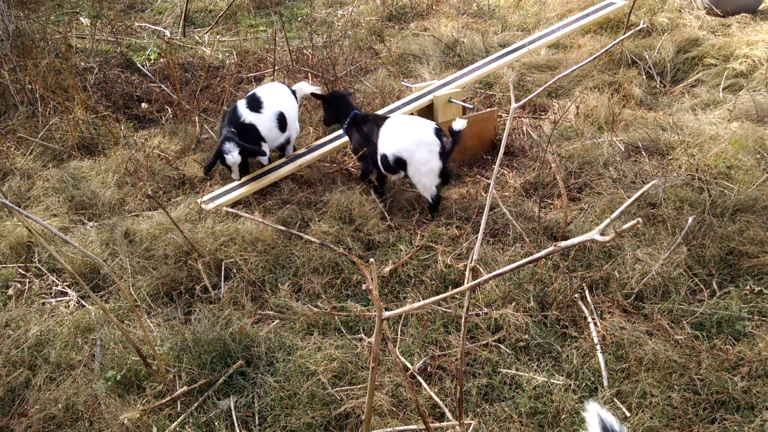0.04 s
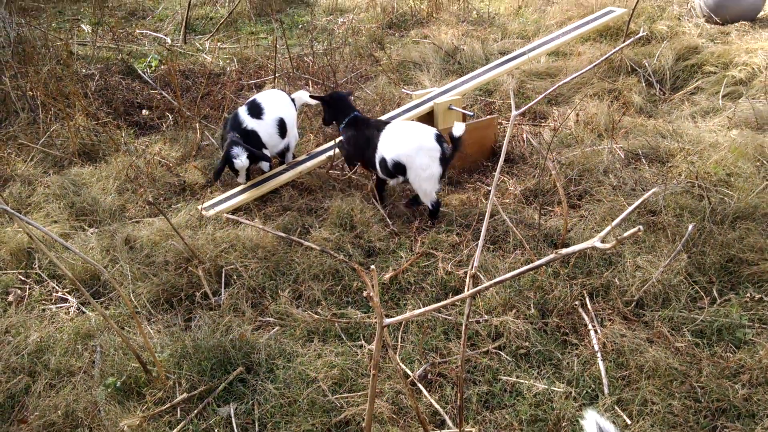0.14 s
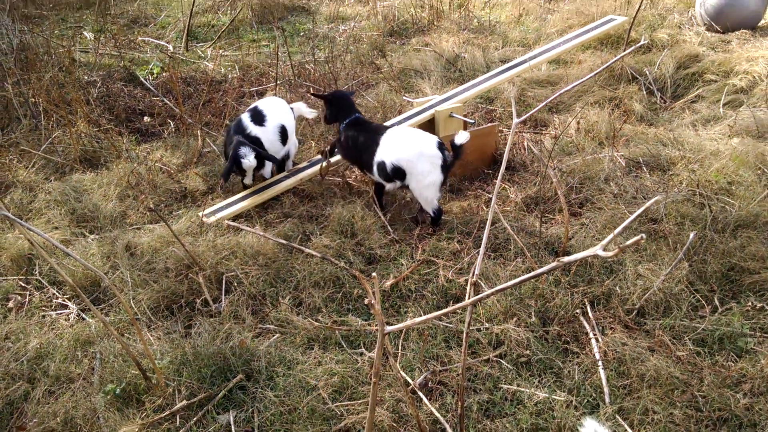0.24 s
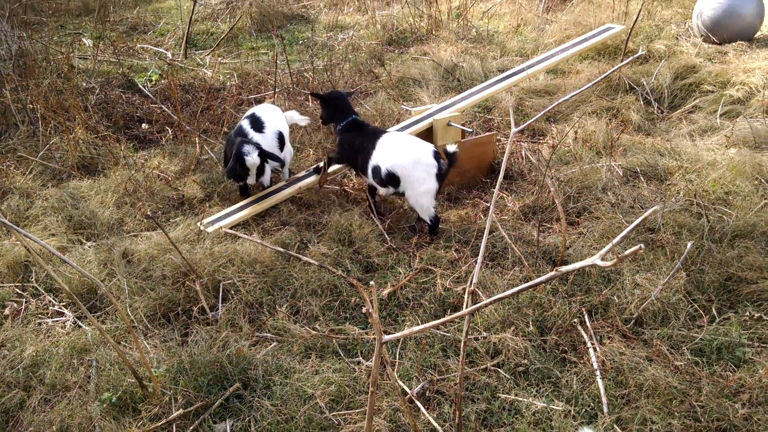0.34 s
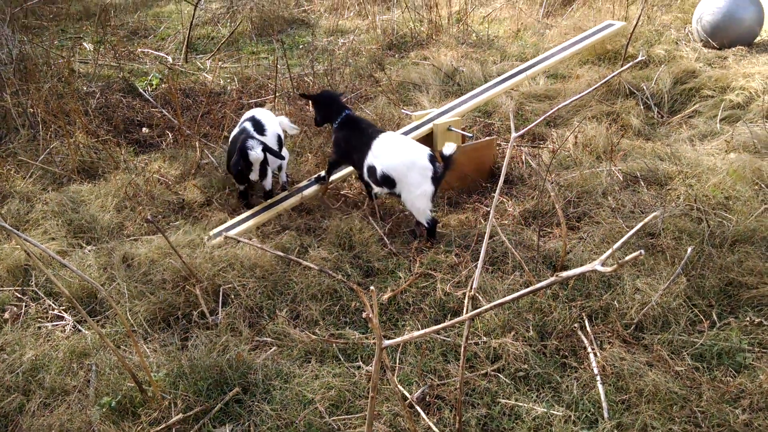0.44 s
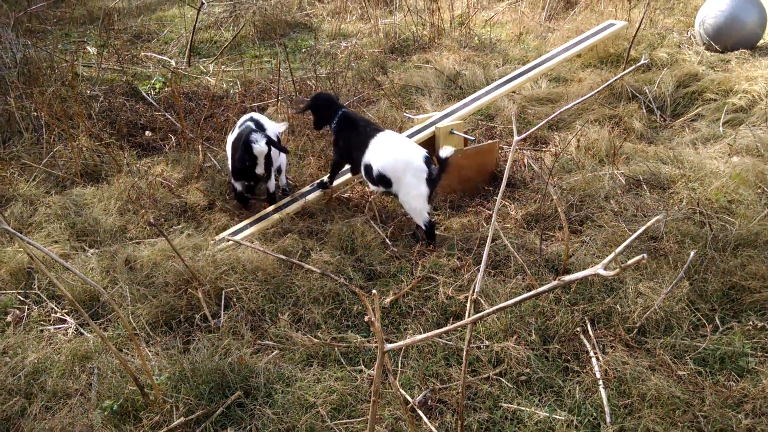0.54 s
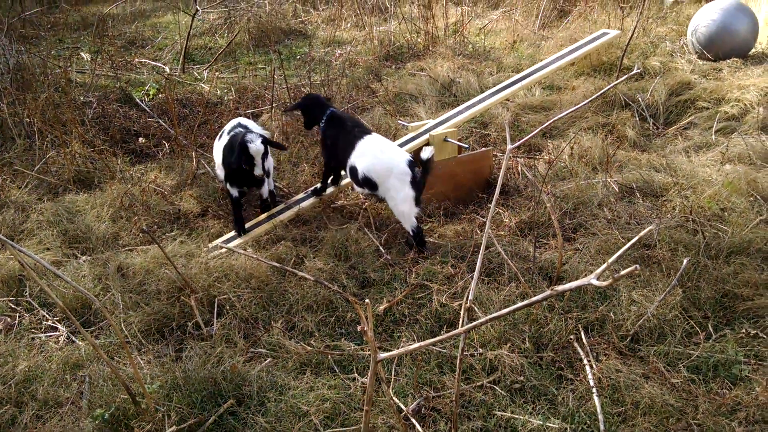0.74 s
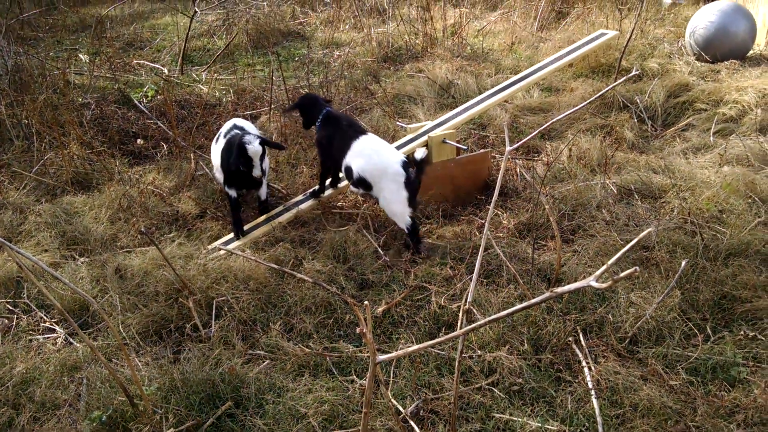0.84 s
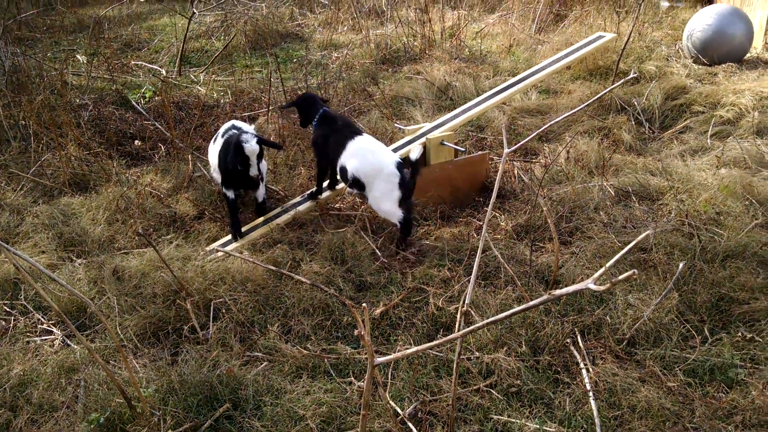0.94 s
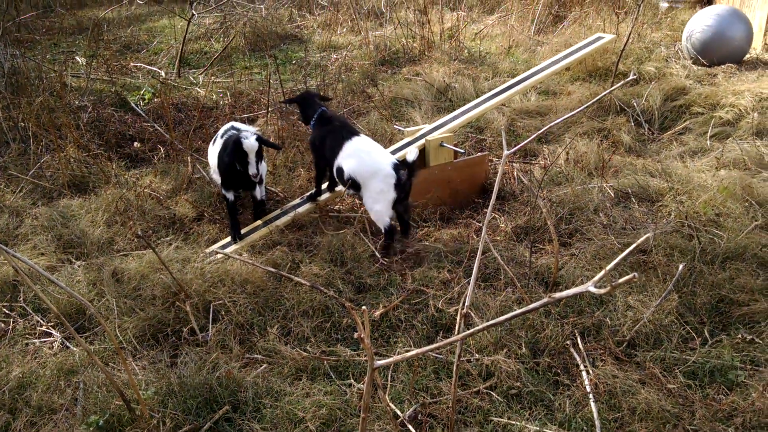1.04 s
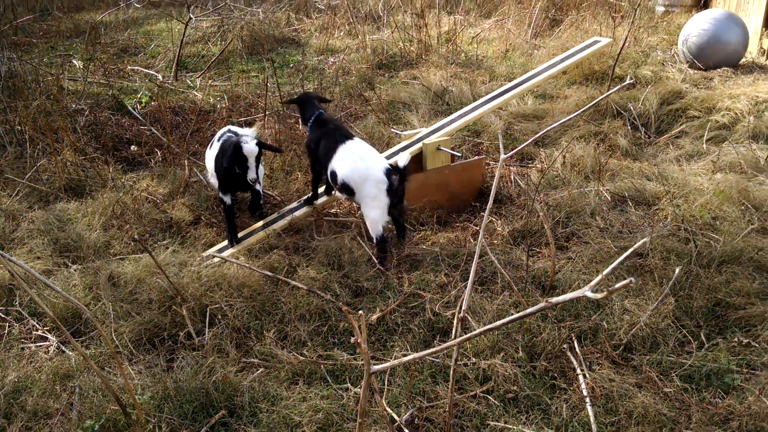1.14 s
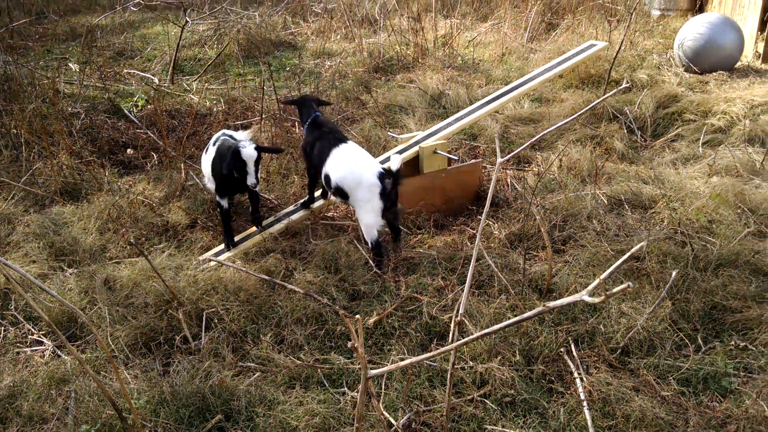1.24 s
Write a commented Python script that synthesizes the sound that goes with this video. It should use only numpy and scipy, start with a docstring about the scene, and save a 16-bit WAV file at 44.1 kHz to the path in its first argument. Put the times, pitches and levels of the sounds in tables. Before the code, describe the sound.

Goat hooves knock on a wooden plank, one sharp clack and several softer taps, among dull close thumps like bumps on the microphone; dry grass ticks and faint wind hisses in an open field.

```python
"""A dry field with a wooden plank lying in it: two young goats step on the board.
Each hoof lands in a few quick contacts that ring the plank's modes and rattle it, with edge clicks and soft rubbing.
Dull, close thumps shake the two microphone ports in opposite directions, like bumps on the camera's body.
Dry stalks tick as short noise bursts; a faint wind is shaped noise, hissing in swells over a low rumble."""
import sys
import numpy as np
from scipy import signal
from scipy.fft import rfft, irfft, next_fast_len
from scipy.io import wavfile
from scipy.ndimage import map_coordinates

SR = 44100
rng = np.random.default_rng(int(sys.argv[2]) if len(sys.argv) > 2 else 0)


def digitize_waveform(pressure):
    """Quantize a signal to 16-bit integers and store it at the path in sys.argv[1].

    Rows of a 2-D input are taken as channels; values are limited to [-1, 1].
    """
    field = np.atleast_2d(pressure).T
    bounded = np.clip(field, -1, 1)
    quanta = np.round(bounded * 32767).astype(np.int16)
    wavfile.write(sys.argv[1], SR, quanta)


N = 57330


def amp(db):
    """Decibels to gain."""
    return 10 ** (np.asarray(db) / 20)


def unit(x):
    """Scale to rms 1."""
    return x / np.sqrt(np.mean(x ** 2) + 1e-20)


def along(points, hz):
    """Read a curve of (f/Hz, value) points on a log frequency axis."""
    f, value = np.transpose(points)
    return np.interp(np.log(hz + 1), np.log(f + 1), value)


def filtered(x, response):
    """Shape the spectrum of x by a response, given as a function of frequency."""
    n = x.shape[-1]
    padded = next_fast_len(n + 8192)
    spectrum = rfft(x, padded) * response(np.fft.rfftfreq(padded, 1 / SR))
    return irfft(spectrum, padded)[..., :n]


def panned(x, pan):
    """Tilt x between left and right, band by band."""
    def gains(hz):
        left_db = along(pan, hz) / 2
        return amp(np.array([left_db, -left_db]))
    return filtered(x, gains)


# likeness of the two ports: [f/Hz, correlation, held within +-0.98]
PORT_LIKENESS = [(30, 0.81), (110, 0.43), (280, 0.27), (600, 0.62), (1300, 1), (1900, 0.089), (2400, -1.01),
                 (2800, -1.01), (3300, -0.31), (4000, 1), (5300, -0.88), (7000, 0.44), (8200, -0.73),
                 (10000, 0.098), (14000, -0.44)]


def noise(colour, size):
    """Coloured stereo noise of rms 1, as the two spaced ports hear a wide source."""
    def mid_side(hz):
        turn = np.arccos(np.clip(along(PORT_LIKENESS, hz), -.98, .98)) / 2
        return amp(along(colour, hz)) * [np.cos(turn), np.sin(turn)]
    mid, side = filtered(rng.standard_normal((2, size)), mid_side)
    return unit(np.array([mid + side, mid - side]))


def wobble(rate):
    """A smooth random curve, rate knots a second."""
    knots = rng.standard_normal(int(N * rate / SR) + 4)
    return map_coordinates(knots, [np.arange(N) * rate / SR])


def add(track, s, sound):
    """Mix a sound into the track at s seconds."""
    part = track[:, max(round(s * SR), 0):][:, :sound.shape[-1]]
    part += sound[..., :part.shape[1]]


# hoof contacts: [t/s, level/dB, brightness f/Hz, place along the board 0-1, free ring 0-1, rattle level/dB]
HOOF_CONTACTS = [(0.2074, -38.5, 616, 0.01, 0.47, -20), (0.2099, -43, 470, 0.33, 0.8, -4),
                 (0.2139, -44, 400, 0.58, .5, -16), (0.3971, -27.5, 2400, 0.03, 0.93, -18),
                 (0.3992, -23, 1650, 0.35, 0.94, -8.5), (0.4074, -33.2, 1950, 0.02, 0.8, -3),
                 (0.407, -29, 2400, 0.21, 0.7, -10), (.4285, -40, 1800, 0.37, 1, -9),
                 (0.5188, -48, 2180, 0.55, 0.4, 2), (.5670, -47, 1100, 0.44, 0.2, -3),
                 (0.6738, -44.5, 2500, 0.28, 0.6, -14), (.6835, -42, 450, 0.16, .5, -1),
                 (.7005, -52, 397, 0.16, 0.2, -1), (0.8115, -40.5, 1300, 0.2, 0.2, -16),
                 (0.8149, -33, 1600, 0.71, 0.8, -16), (0.864, -37, 860, 0.89, 0.78, -12),
                 (0.8675, -35, 810, 0.83, 0.73, -25), (0.8778, -37.5, 3000, 0.53, 0.5, -2),
                 (0.8850, -42, 1600, 0.84, .4, -6), (1.0691, -44.5, 3500, 0.24, 0.5, 1),
                 (1.1737, -41.5, 596, 0.95, 0.4, -2), (1.1985, -46, 805, 0.96, .5, 7),
                 (1.2038, -36.5, 524, 0.13, 0, -7)]
# modes of the plank: [f/Hz, level/dB, t60/s]
PLANK_MODES = [(227.7, -11, 0.2), (342.6, -0.5, 0.039), (376.8, -8, 0.28), (507, -13.5, 0.06),
               (541, -2, 0.026), (624.6, -18, 0.28), (904, -15.5, 0.2), (1085.5, -11, 0.083),
               (1204, -6.5, 0.075), (1270, -8, 0.061), (1384, -8, 0.065), (1600, -27, 0.071),
               (1760, -46, 0.054), (272.2, -6.5, 0.07)]
# colour of the board's dense, short-lived rattle: [f/Hz, level/dB per Hz]
RATTLE_COLOUR = [(100, -30), (250, 5), (550, -1.5), (800, 8.5), (1600, -6), (2000, -15.5), (2700, -6.5),
                 (4000, -7), (6000, -28), (12000, -54)]
# where the plank sits in the stereo picture: [f/Hz, left minus right level/dB]
PLANK_BALANCE = [(150, -5), (380, -6), (700, -4.5), (1300, 0), (3000, 10)]
PLACE_DEPTH = 0.92  # how much the place of a contact favours some modes over others
MODE_SCATTER_DB = 1.5
HOOF_DAMPING_DB_PER_S = 691  # extra decay under a hoof that stays firmly down
PLANK_ATTACK_S = .0006
RATTLE_T60_S, RATTLE_LOW_T60_S, RATTLE_SPLIT_HZ = .075, .125, 550
BASS_CUT_HZ = 195  # a narrow board radiates little below this


def hooves():
    """Contacts rattle the board and ring modes by place; soft ones lack highs, a staying hoof damps the ring."""
    out, t = np.zeros((2, N)), np.arange(SR // 3) / SR
    hz, mode_db, t60 = np.transpose(PLANK_MODES)[:, :, None]
    order = np.arange(len(PLANK_MODES))[:, None] + 1
    rise = 1 - np.exp(-t / PLANK_ATTACK_S)
    for s, db, bright_hz, place, free, rattle_db in HOOF_CONTACTS:
        softness = lambda f: 1 / np.sqrt(1 + (f / bright_hz) ** 4)
        damping_db = HOOF_DAMPING_DB_PER_S * (1 - min(free, 1)) * t

        modes = amp(mode_db - 60 * t / t60 - damping_db) * np.sin(2 * np.pi * hz * t)
        favour = 1 + PLACE_DEPTH * np.cos(np.pi * order * place)
        scatter = amp(MODE_SCATTER_DB * rng.standard_normal(hz.shape))
        ring = np.sum(modes * softness(hz) * favour * scatter, axis=0)

        rattle = filtered(rng.standard_normal(len(t)), lambda f: amp(along(RATTLE_COLOUR, f)))
        rattle = filtered(unit(rattle), softness)
        low = filtered(rattle, lambda f: 1 / (1 + (f / RATTLE_SPLIT_HZ) ** 4))
        high = rattle - low
        rattle = low * amp(-60 * t / RATTLE_LOW_T60_S) + high * amp(-60 * t / RATTLE_T60_S)

        add(out, s, amp(db) * rise * (ring + amp(rattle_db - damping_db) * rattle))
    bass_cut = signal.butter(2, BASS_CUT_HZ, 'high', fs=SR)
    return panned(signal.lfilter(*bass_cut, out), PLANK_BALANCE)


# the hoof's hard edge on the wood: [t/s, level/dB, centre f/Hz, width/octaves, t60/s]
EDGE_CLICKS = [(0.3965, -38.5, 8900, 0.67, 0.022), (0.397, -38, 3970, 0.099, .03),
               (.4005, -30.5, 1472, 0.18, 0.046), (0.814, -33, 1238, 0.15, 0.048),
               (0.8136, -43, 1814, 0.055, 0.031), (.8636, -44, 5100, 0.75, 0.0078),
               (0.8684, -44, 5360, 0.6, 0.011), (0.8753, -40.5, 3600, 0.49, 0.023),
               (0.877, -43, 1690, 0.4, 0.061), (1.068, -51.5, 3680, 0.3, 0.024)]


def clicks():
    """Horn meets wood: a short, decaying burst of noise around one pitch."""
    out, t = np.zeros((2, N)), np.arange(SR // 20) / SR
    for s, db, centre_hz, width_oct, t60 in EDGE_CLICKS:
        band = lambda f: 1 / (1 + (np.log2((f + 1) / centre_hz) / width_oct) ** 4)
        burst = unit(filtered(rng.standard_normal(len(t)), band))
        add(out, s, burst * amp(db - 60 * t / t60))
    return out


# soft rubbing swells: low ones like hooves on wood, the long one at 12 kHz a bright rustle of dry grass:
# [middle t/s, half length t/s, level/dB, centre f/Hz]
RUBBING_SWELLS = [(0.192, 0.034, -52, 3560), (0.241, 0.013, -51.5, 3740), (0.322, 0.028, -50, 1370),
                  (0.596, 0.097, -51, 12300), (.626, 0.012, -49, 844), (0.68, 0.0056, -44.5, 1060),
                  (0.685, 0.015, -47.5, 343), (1.071, 0.0023, -48, 1310), (1.205, 0.0081, -49, 700)]
RUB_WIDTH_OCT = 0.26
RUB_GRAIN_DB, RUB_GRAINS_PER_S = 4, 310  # the rubbing flickers in level


def rubbing():
    """Soft, grainy swells of rubbing noise, each around one pitch."""
    out, t = np.zeros((2, N)), np.arange(N) / SR
    for s, half_s, db, centre_hz in RUBBING_SWELLS:
        band = lambda f: 1 / (1 + (np.log2((f + 1) / centre_hz) / RUB_WIDTH_OCT) ** 2)
        grains = rng.standard_normal(N) * amp(RUB_GRAIN_DB * wobble(RUB_GRAINS_PER_S))
        swell = np.exp(-((t - s) / half_s) ** 2)
        out += unit(filtered(grains, band)) * amp(db) * swell
    return out


# dull thumps: [t/s, level/dB, pitch f/Hz, rise t/s]
DULL_THUMPS = [(0.075, -30, 150, 0.0068), (.1120, -9, 169, 0.0042), (0.1278, -23.5, 150, 0.0054),
               (0.1407, -27.5, 159, 0.0029), (0.2526, -28.5, 195, 0.0046), (0.3586, -9.5, 174, 0.0037),
               (0.374, -31, 160, 0.0045), (0.4616, -26, 160, .0054), (0.6816, -17.5, 180, 0.0052),
               (0.7006, -23, 157, 0.0037), (0.9005, -51, 165, 0.0026)]
THUMP_SHAPE = 2.2  # envelope steepness
THUMP_SAG = 0.14  # pitch starts this share above the listed one and sinks towards as far below
THUMP_LEFT_DB, THUMP_LAG_S = -3, .00023  # the left port is weaker and later
THUMP_WEIGHT_DB, THUMP_WEIGHT_HZ = -32, 69.6  # the slower push under each thump


def thumps():
    """Two or three heavily damped low cycles, opposite in sign at the two ports."""
    out = np.zeros((2, N))
    port_gain = np.array([[amp(THUMP_LEFT_DB)], [-1]])
    t = np.maximum(np.arange(SR // 10) / SR - np.array([[THUMP_LAG_S], [0]]), 0)
    for s, db, hz, rise_s in DULL_THUMPS:
        u = t / rise_s
        swell = (u * np.exp(1 - u)) ** THUMP_SHAPE
        cycles = hz * ((1 - THUMP_SAG) * t + 2 * THUMP_SAG * rise_s * (1 - np.exp(-u)))
        push = amp(THUMP_WEIGHT_DB) * np.cos(2 * np.pi * THUMP_WEIGHT_HZ * t)
        swing = np.sin(2 * np.pi * cycles) + push
        add(out, s, amp(db) * swell * swing * port_gain)
    return out


# dry stalks ticking: [t/s, level/dB, t60/s]
STALK_TICKS = [(0.0234, -40, 0.0029), (0.2322, -25, 0.007), (0.5938, -37, 0.0062), (0.61, -33.5, 0.0018),
               (.7860, -38, 0.0052), (.8960, -38, 0.003), (1.2558, -37, 0.006)]
# colour of a snapping stalk, also of the wind's crackle: [f/Hz, level/dB per Hz]
STALK_COLOUR = [(1500, -40), (3000, 0), (5000, -12), (7000, 7), (9000, -1.5), (11500, -4.5), (15000, -9)]
# stereo balance of stalks and hiss: [f/Hz, left minus right level/dB]
GRASS_BALANCE = [(1000, -2), (5000, 0.5), (8000, -1.5), (12000, -8)]


def stalks():
    """Brief bright snaps of dry grass: noise that dies within milliseconds."""
    out, t = np.zeros((2, N)), np.arange(SR // 20) / SR
    for s, db, t60 in STALK_TICKS:
        add(out, s, noise(STALK_COLOUR, size=len(t)) * amp(db - 60 * t / t60))
    return panned(out, GRASS_BALANCE)


# swells of the hiss in the grass: [t/s, level/dB]
HISS_SWELLS = [(0, -55.5), (.08, -54.5), (0.161, -50.5), (0.241, -44.5), (.275, -49.5), (.33, -45.5),
               (.38, -47.5), (0.433, -55), (.49, -45.5), (.6, -44.5), (.67, -47.5), (.72, -56.5),
               (.81, -56), (.9, -50), (1.001, -52.5), (1.17, -49.5), (1.23, -52.5), (1.3, -53)]
# colour of the hiss: [f/Hz, level/dB per Hz]
HISS_SPECTRUM = [(300, -1), (1200, 4), (2100, 1), (2700, 0.5), (3400, 1.5), (4000, 1.5), (5400, 2.5),
                 (7000, 1.5), (8500, 2), (11500, 0.5), (15500, -5)]
# colour of the field's steady air: [f/Hz, level/dB per Hz]
AIR_COLOUR = [(30, 5.5), (110, -1.5), (190, 1), (400, 0), (700, -0.5), (1100, -3), (1700, -12.5),
              (2600, -14), (5000, -24), (15000, -21)]
# colour of the rumble on the ports: [f/Hz, level/dB per Hz]
RUMBLE_COLOUR = [(10, -18.5), (30, -12), (55, 0), (75, -3.5), (105, -2), (160, -14.5), (400, -45)]
# phase between the ports: [f/Hz, lead of the left/radians]
PORT_LEAD = [(40, 2.5), (130, 3), (280, 0.1), (1500, 0.82), (2500, -0.5)]
HISS_FLUTTER_DB = 1.5
AIR_DB, RUMBLE_DB = -51, -51
CRACKLE_PER_S, CRACKLE_DB, CRACKLE_SPREAD_DB = 490, -17, 8  # tiny snaps of dry grass, level re the hiss
SNAP_S = 0.00055  # decay time constant of one tiny snap


def wind():
    """Swelling hiss and crackle in the grass over steady air and rumble, shifted in phase between the ports."""
    hiss_db = np.interp(np.arange(N) / SR, *np.transpose(HISS_SWELLS))
    hiss_db = hiss_db + HISS_FLUTTER_DB * wobble(rate=76)

    snap_gain = amp(CRACKLE_SPREAD_DB * rng.uniform(-1.1, 1, N))
    snaps = (rng.random(N) < CRACKLE_PER_S / SR) * snap_gain
    snap_envelope = signal.lfilter([1], [1, -np.exp(-1 / (SNAP_S * SR))], snaps)
    crackle = unit(snap_envelope * noise(STALK_COLOUR, size=N))

    grass = noise(HISS_SPECTRUM, size=N) + amp(CRACKLE_DB) * crackle
    hiss = panned(grass, GRASS_BALANCE) * amp(hiss_db)
    rumble = noise(RUMBLE_COLOUR, size=N) * amp(RUMBLE_DB)
    air = noise(AIR_COLOUR, size=N) * amp(AIR_DB)
    lead = lambda hz: np.exp(.5j * along(PORT_LEAD, hz) * np.array([[1], [-1]]))
    return filtered(hiss + rumble + air, lead)


def scene():
    """Everything in the open air, with no echo."""
    return hooves() + clicks() + rubbing() + thumps() + stalks() + wind()


HOLLOW_DB, HOLLOW_HZ, HOLLOW_WIDTH_HZ = -12, 2627, 243  # narrow dip in the overall tone
TOP_HZ = 15800


def record(dry):
    """The whole sound is thinner in a narrow band near 2.6 kHz, and nothing remains above the band limit."""
    def response(hz):
        hollow = amp(HOLLOW_DB * np.exp(-((hz - HOLLOW_HZ) / HOLLOW_WIDTH_HZ) ** 2))
        return hollow * (hz < TOP_HZ)
    return filtered(dry, response)


dry = scene()
out = record(dry)
digitize_waveform(out)
```